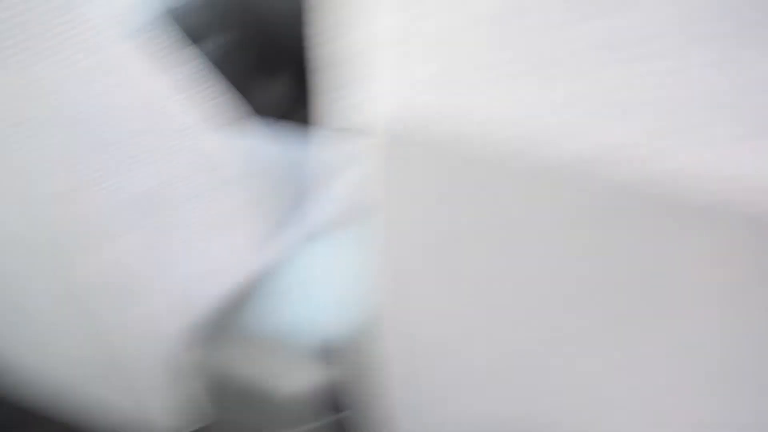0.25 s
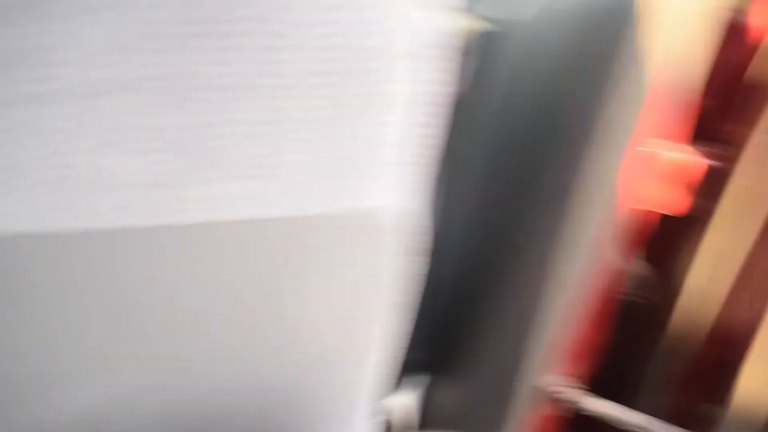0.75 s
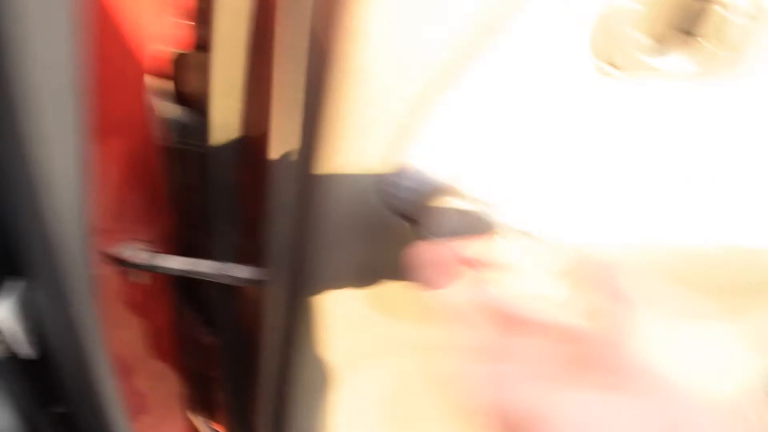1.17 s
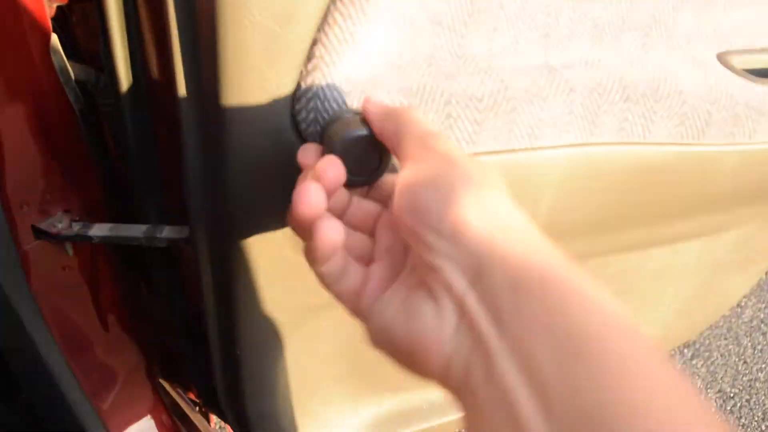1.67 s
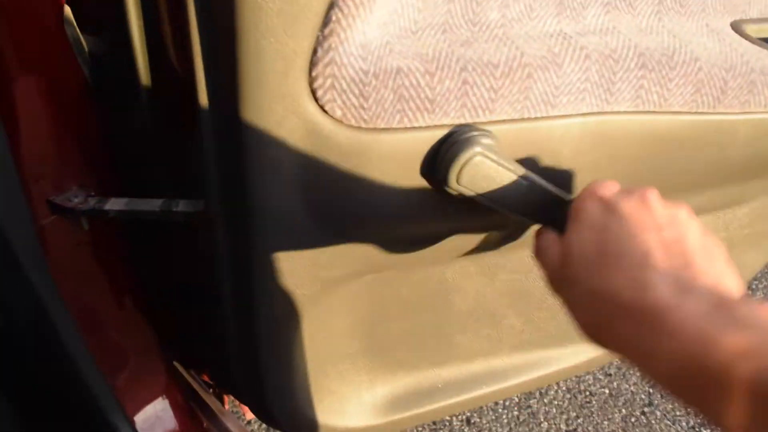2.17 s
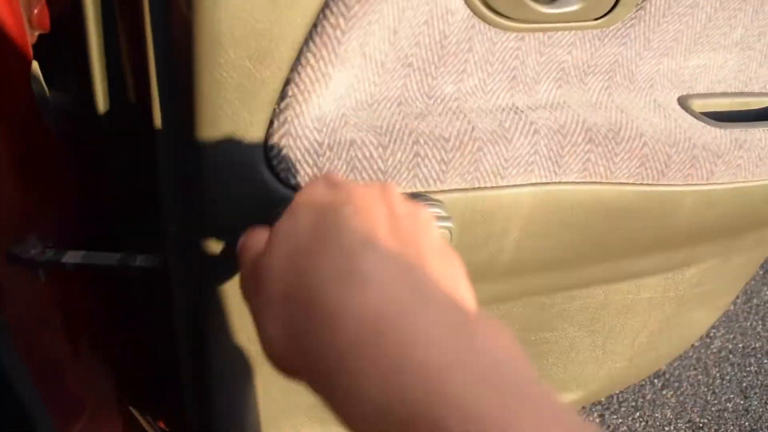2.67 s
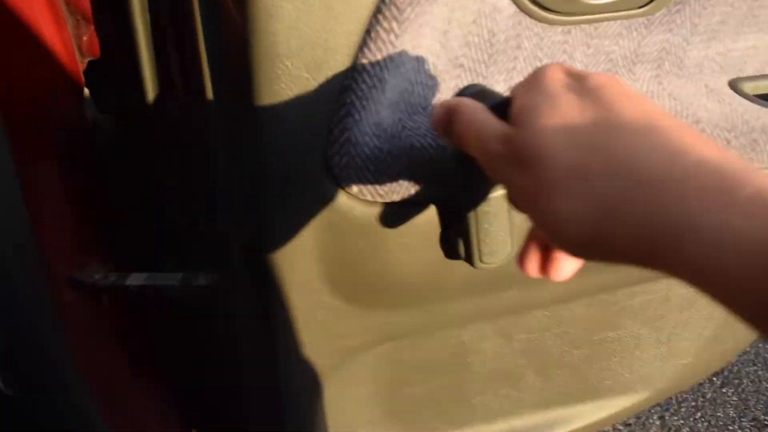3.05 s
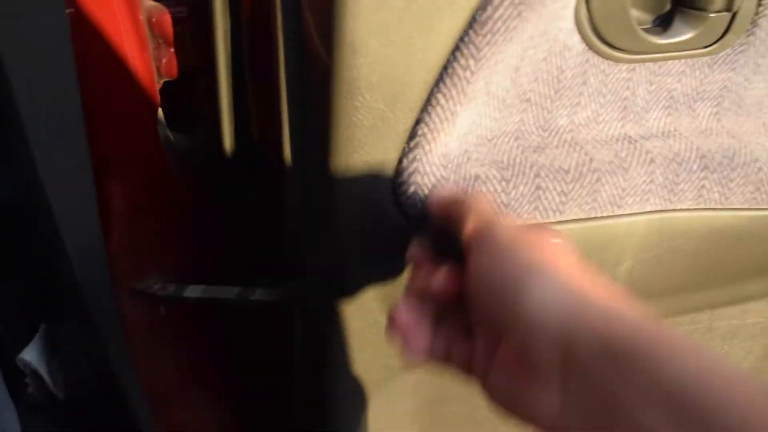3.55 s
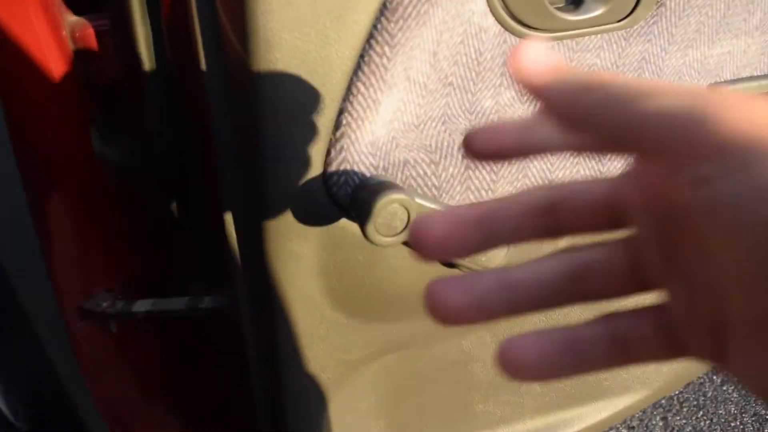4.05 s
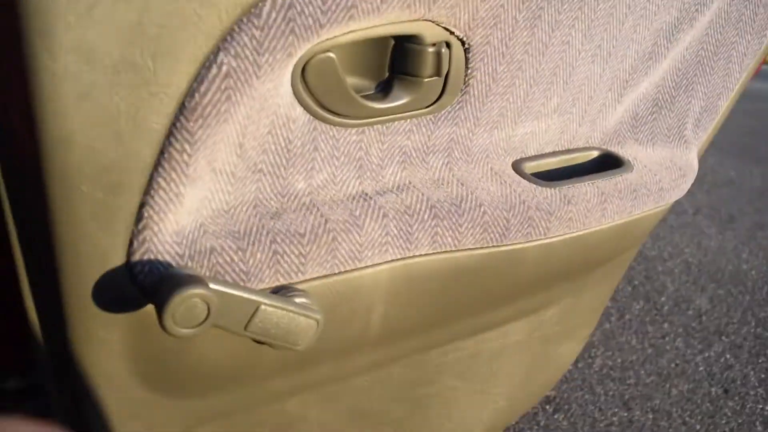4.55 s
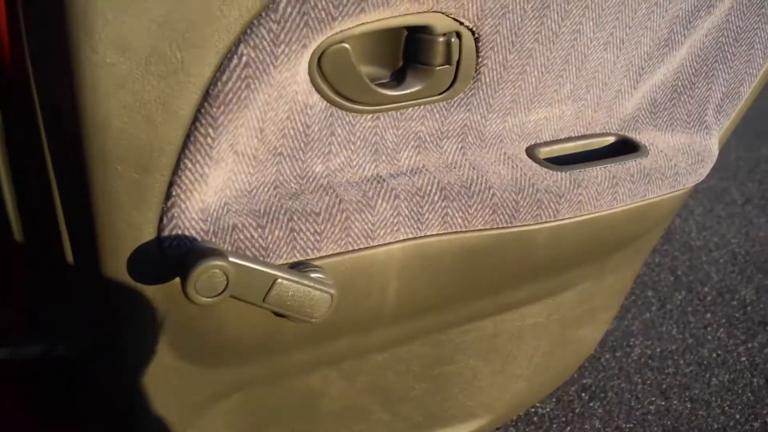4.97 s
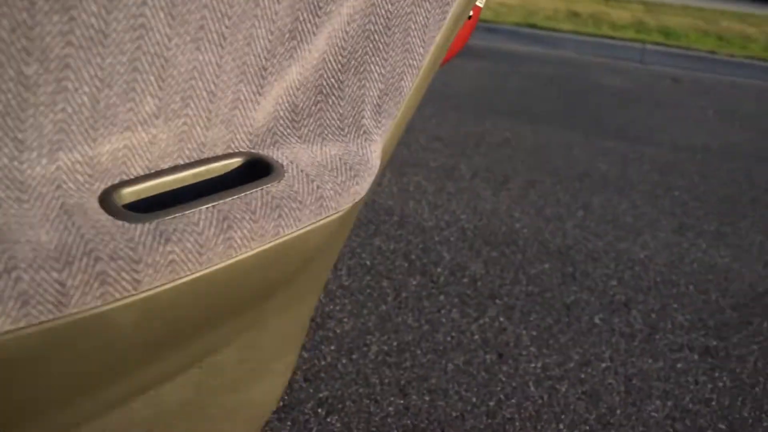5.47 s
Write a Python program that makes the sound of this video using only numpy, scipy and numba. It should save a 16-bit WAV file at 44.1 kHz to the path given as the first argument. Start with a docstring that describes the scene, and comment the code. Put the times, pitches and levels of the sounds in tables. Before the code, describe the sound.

Very close, practically mono microphone at an open car door outdoors. Tiny squeaks and faint cloth rustle lead to a sharp plastic click, then a tight cluster of clacks as the winder is taken. Two soft sliding rubs follow as it turns, ending in a loud hollow clunk. Light knocks and shuffling come next, then a last crisp click amid dry hinge creaks. Uneven low wind rumble runs beneath.

```python
"""Car window winder, open door, outdoors

A hand turns the winder close to one microphone: knob, gear and end stop ring the door modes,
plastic snaps as noise bursts, cloth and sliding glass rub as filtered noise of uneven grain.
At the end the hinge creaks in short resonant scrapes; small sine glides squeak near the start.
Breeze (moving band-pass noise), single eddies, a distant hush and two preamplifier hisses lie below.
"""
import sys
import numpy as np
from scipy import signal
from scipy.fft import rfft, irfft
from scipy.io import wavfile
from scipy.ndimage import uniform_filter1d
from numba import njit

SR = 44100
rng = np.random.default_rng(int(sys.argv[2]) if len(sys.argv) > 2 else 0)


def makeup_ratio(level_db):
    """Linear amplitude ratio for a level in decibels (20 dB per factor of ten)."""
    decades = np.asarray(level_db, float) / 20
    return 10 ** decades


def to_wav(sig):
    """Store sig (one row per channel, or 1-D mono) as 16-bit WAV at the path in sys.argv[1].

    Samples outside -1..1 are clipped; the rate is SR.
    """
    pcm = np.clip(np.atleast_2d(sig), -1, 1) * 32767
    pcm = np.round(pcm).astype(np.int16)
    wavfile.write(sys.argv[1], SR, pcm.T)  # frames by channels


N = 252119  # samples

# knocks, peaks before rattle: t/s, mid peak/dB, strongest pitch f/Hz, thud peak/dB, click peak/dB
KNOCKS = [(.432, -46, 515, -48, -42), (.62, -38.5, 403, -45.5, -44), (.654, -41.5, 506, -52, -48),
          (.762, -47, 845, -44, -41), (.841, -32.5, 830, -45, -38), (.992, -18.5, 1490, -55, -13.5),
          (1.103, -40.5, 477, -40.5, -50), (1.174, -33, 1090, -36.5, -38.5), (1.284, -29, 970, -39, -28.5),
          (1.291, -26.5, 890, -28.5, -32), (1.309, -31, 800, -30, -45), (1.343, -40, 1720, -44, -38),
          (1.577, -35.5, 570, -32.5, -61), (1.613, -44, 885, -44, -44), (1.701, -35, 875, -34, -41),
          (1.719, -24, 780, -15, -21.5), (1.723, -17.5, 600, -20.5, -31), (1.729, -19.5, 890, -24.5, -17),
          (1.753, -13, 1040, -24.5, -26), (1.761, -22, 730, -21, -36), (1.783, -31, 764, -27, -28),
          (1.799, -32.5, 600, -30.5, -44), (1.812, -35, 850, -32, -44), (1.83, -31.5, 1040, -43, -54),
          (1.923, -39, 1610, -45, -35), (1.93, -30.5, 855, -30.5, -35.5), (2.143, -35.5, 745, -42, -33),
          (2.446, -32, 1250, -41, -52), (2.781, -36.5, 730, -40.5, -63), (2.824, -26, 650, -34, -35),
          (2.847, -20, 770, -35, -32.5), (2.871, -28, 680, -30, -54), (2.894, -41, 713, -39, -47),
          (3.556, -4.5, 483, -7, -28), (3.56, -11.5, 700, -10.5, -16), (3.568, -11, 410, -19.5, -36),
          (3.575, -20, 694, -23, -40), (3.589, -25, 644, -20, -35), (3.61, -29, 500, -25, -58),
          (3.656, -46, 470, -33.5, -60), (3.683, -44, 1140, -33, -43), (3.858, -38.5, 756, -49, -48),
          (4.183, -30, 460, -35.5, -36), (4.653, -29, 1040, -34, -36.5), (4.77, -31.5, 1280, -48, -46),
          (4.818, -32.5, 1010, -39, -31.5), (4.909, -32.5, 800, -52, -37), (5.005, -25, 400, -26.5, -29.5),
          (5.132, -41, 476, -49, -41), (5.521, -17, 1026, -34, -29), (5.524, -22.5, 2200, -34, -27.5)]
# modes of door panel, winder and glass: f/Hz, relative level/dB, undamped t60/s
DOOR_MODES = [(94.2, 6.5, 0.14), (144, 2, 0.12), (182.3, -1.5, 0.21), (287, -4.5, 0.087), (345, 1.5, 0.056),
              (488, 10, 0.04), (569, 10.5, 0.028), (742, 10, 0.051), (851, 2.5, 0.082), (1040, 6, 0.057),
              (1106, 11.5, 0.033), (1216, -3, 0.099), (1281, -3, 0.13), (1510, 7, 0.053),
              (1672, 1.5, 0.042), (1960, 6, 0.11), (2300, 6.5, 0.078), (2593, 19.5, 0.029),
              (2830, 9, 0.072), (2950, 6, 0.089), (3290, 11, 0.068), (3740, 10, 0.046), (4530, 9, 0.057),
              (5160, 9.5, 0.025)]
# noise of first contact: f/Hz, width/Hz, relative level/dB
CRACK_BANDS = [(4050, 1400, 2.5), (9500, 8000, -31)]
# dry snaps of plastic on plastic: t/s, t60/s, peak/dB, centre f/Hz
SNAPS = [(.199, 0.023, -46.5, 4500), (.62, 0.018, -37.5, 3000), (.842, 0.017, -32, 3500),
         (.992, 0.014, -14.5, 3020), (1.058, .015, -50, 2500), (1.168, .04, -44, 4000),
         (1.283, 0.046, -35, 3500), (1.291, 0.037, -36, 6000), (1.343, .02, -48, 3000),
         (1.698, 0.025, -41, 2800), (1.924, 0.026, -45, 3000), (2.447, .02, -36, 2500),
         (4.185, .04, -46, 2500), (4.265, .02, -50, 4000), (4.654, .025, -40, 2200),
         (5.008, .05, -30, 3000), (5.522, 0.066, -28, 2020)]
# glass sliding in its felt, one table a pull: t/s, treble level/dB
SLIDES = [
    [(1.92, -74), (1.95, -53.5), (2.0, -51), (2.12, -50.5), (2.4, -55), (2.62, -47.5), (2.68, -51.5),
     (2.75, -81)],
    [(2.98, -61.5), (3.06, -53), (3.14, -47), (3.23, -52), (3.32, -48), (3.49, -49), (3.54, -51),
     (3.57, -63)],
]
# cloth and shoes shuffling: t/s, treble level/dB, body over treble/dB
SHUFFLE = [(0, -80, 20), (.25, -67, 6.5), (.55, -77, 5), (.7, -58.5, -4), (1.1, -62.5, 2.5),
           (1.55, -63, 0.5), (1.7, -66.5, 12), (2.85, -62, 2.5), (3.65, -63.5, 2), (3.9, -64, 6.5),
           (4.16, -55, 5), (4.31, -53.5, 7), (4.55, -54, 7.5), (4.8, -53, 6), (5.04, -47, 5),
           (5.12, -51.5, 6), (5.24, -57, 7.5), (5.45, -57.5, 12.5), (5.72, -52.5, 12.5)]
# hand and knob scraping the trim: t/s, hold/s, treble level/dB, body over treble/dB
SCRAPES = [(0.446, .01, -64, 9), (0.835, 0.032, -57.5, 3), (1.028, 0.041, -62.5, 7),
           (1.258, 0.044, -71, 14), (1.738, 0.024, -47, 8.5), (1.781, 0.066, -46, 4), (2.837, 0.1, -57, 5),
           (3.552, 0.0077, -33, -1.5), (5.14, .01, -49.5, 14.5), (5.185, .01, -52, 13.5)]
# panel body under rubbing: f/Hz, width/Hz, relative level/dB
RUB_BODY_BANDS = [(470, 400, -2.5), (754, 337, 2), (1028, 287, 1), (1394, 395, -4), (2120, 340, -10)]
# bright panel edge under rubbing: f/Hz, width/Hz, relative level/dB
RUB_EDGE_BANDS = [(1923, 440, -1.5), (2480, 760, 4.5), (3470, 1500, 0.5)]
# hinge slips: t/s, peak/dB
HINGE_SLIPS = [(5.304, -51), (5.329, -71), (5.397, -43), (5.429, -40), (5.459, -41), (5.585, -34),
               (5.617, -29.5), (5.647, -28.5), (5.672, -32.5), (5.697, -36)]
# steady hinge drag: t/s, level/dB
HINGE_DRAG = [(5.24, -85), (5.31, -63), (5.45, -50), (5.55, -57), (5.63, -70), (5.72, -58)]
# hinge resonances: f/Hz, width/Hz, relative level/dB
HINGE_BANDS = [(610, 72, 17.5), (1090, 250, 0), (1320, 67, 3)]
# squeaks of seat trim: t/s, length/s, peak/dB, mean f/Hz
SQUEAKS = [(0.2, 0.0069, -40, 2950), (.228, 0.0084, -39.5, 2940), (0.24, 0.0061, -41, 2910)]
# breeze on the capsule: t/s, eddy level/dB, eddy f/Hz
BREEZE = [(0.0, -54, 55), (0.1, -39.5, 62), (0.64, -54, 53), (1.0, -45, 68), (1.31, -40.5, 130),
          (1.45, -54.5, 90), (1.78, -47, 119), (1.97, -42, 87), (2.38, -52, 87.5), (2.5, -36, 92),
          (2.76, -37.5, 68), (3.0, -33, 86.5), (3.1, -55.5, 75.4), (3.23, -40.5, 79.6), (3.45, -51, 104),
          (3.66, -34.5, 100), (3.81, -43.5, 77.6), (3.92, -35.5, 81), (4.25, -36, 77), (4.62, -34.5, 91),
          (4.9, -39.5, 77), (5.48, -40.5, 71), (5.55, -51, 82), (5.72, -46, 105)]
# single strong eddies: t/s, peak/dB, f/Hz, length/cycles
BUFFETS = [(0.074, -31.5, 42, 1.4), (0.117, -32.5, 61, 1.65), (0.266, -30.5, 55, 2),
           (1.05, -34.5, 40, 1.15), (1.191, -39, 57, 2.6), (2.134, -30.5, 85, 0.92), (2.483, -31, 116, 1.3),
           (2.575, -21.5, 119, 1.56), (2.585, -22.5, 76.5, 2.7), (2.977, -28.5, 103, 2.4),
           (3.225, -37.5, 67, 1.9), (3.949, -22.5, 103, 2.1), (3.974, -17.5, 122, 1.17),
           (4.008, -22.5, 112, 2.5), (4.127, -26, 86, 3.1), (4.291, -26, 103, 1.6), (4.328, -23, 95, 1.3),
           (4.44, -26, 74.5, 2.1), (4.545, -15.5, 96, 2.3), (4.568, -16.5, 53, 1.4),
           (4.593, -15, 134, 1.46), (4.611, -15, 79, 0.91), (4.668, -20.5, 74, 1.57),
           (4.708, -22.5, 107.5, 2.5), (4.95, -27.5, 40.3, 1.4), (4.976, -24.5, 90, 3.8),
           (5.033, -26, 44, 1.7), (5.053, -27, 43.1, 1.15), (5.209, -32, 39, 1)]
# open-air hush with capsule hiss: f/Hz, relative density/dB
AIR_SPECTRUM = [(88, -40), (150, -9.5), (226, 3), (361, -18.5), (905, -6.5), (1260, -12.5), (1600, -15),
                (2870, -15), (5790, -24), (14800, -22.5), (16000, -46)]
# preamplifier noise: f/Hz, width/Hz, relative level/dB
PREAMP_BANDS = [(400, 170, -2), (12000, 9000, 0.5)]

THUD_TOP_HZ, CLICK_FOOT_HZ = 400, 1900
CLICK_HZ, CLICK_OCT_PER_DB = 2410, -0.05
# t60 factors: panel below THUD_TOP_HZ, modes above it, extra above CLICK_FOOT_HZ
PANEL_RING, UPPER_RING, CLICK_RING = 0.44, 0.058 / 0.12, 0.57
MODE_SCATTER_DB, MODE_RISE_CYCLES = 2.2, 1.8
CRACK_T60_S, CRACK_RISE_S = 0.029, 0.00056
RATTLE_S, RATTLE_DB = 0.02, -8
CAVITY_T60_S, CAVITY_RISE_S, CAVITY_DB = 0.18, 0.0011, -13
SNAP_RISE_S, SNAP_WIDTH_PER_HZ = 0.00042, 0.8
SLIDE_BODY_OVER_TREBLE_DB = 3
SCRAPE_RISE_S, SCRAPE_FALL_S = 0.016, 0.015  # time constants
RUB_TOP_HZ, RUB_TOP_DB = 4700, -11
RUB_FLICKER_DB, RUB_FLICKER_RATE_HZ = 0.9, 45
SLIP_DECAY_S, SLIP_RISE_S = 0.004, 0.00064  # decay is a time constant
DRAG_FLICKER_DB, DRAG_FLICKER_RATE_HZ = 3.9, 38
SQUEAK_GLIDE = 0.088  # total rise over mean pitch
GUST_RATE_HZ, FRINGE_GUST_DB = 21.86, 5.5
AIR_DB, PREAMP_DB = -58.5, -71


def curve(table):
    """Interpolate table columns to one value a sample."""
    s, *columns = np.transpose(table)
    return [np.interp(np.arange(N) / SR, s, c) for c in columns]


def level(x, db):
    """Set the rms."""
    return x * makeup_ratio(db) / np.sqrt(np.mean(x ** 2))


def peak(x, db):
    """Set the absolute peak."""
    return x * makeup_ratio(db) / np.abs(x).max()


def decay(t, t60_s):
    """Exponential fall of 60 dB in t60_s."""
    return np.exp(-np.log(1000) * t / t60_s)


def add_at(out, s, sound):
    """Add a sound in place from time s."""
    start = int(s * SR)
    out[start:start + len(sound)] += sound


@njit
def svf(x, hz, width):
    """State-variable band-pass with movable centre, gain 1 at the centre."""
    y, b, l = np.empty(len(x)), 0., 0.
    for i in range(len(x)):
        g, k = np.tan(np.pi * hz[i] / SR), width[i] / hz[i]
        v = (b + g * (x[i] - l)) / (1 + g * (g + k))
        b, l, y[i] = 2 * v - b, l + 2 * g * v, k * v
    return y


def resonate(x, bands):
    """Sum of fixed resonances, neighbours in opposite sign."""
    one = np.ones(len(x))
    return sum((-1) ** k * makeup_ratio(db) * svf(x, hz * one, width * one)
               for k, (hz, width, db) in enumerate(bands))


def walk(rate_hz):
    """Random levels held 1 / rate_hz and smoothed twice; spread near 1."""
    hold = int(SR / rate_hz)
    steps = np.repeat(rng.standard_normal(N // hold + 1), hold)
    return 1.41 * uniform_filter1d(uniform_filter1d(steps, hold), hold)[:N]


def knocks():
    """Blows ring shared modes: mid near the blow's pitch, low by its weight, top by its hardness."""
    out, skin = np.zeros(N + SR), np.zeros(N + SR)
    hz, mode_db, mode_t60_s = np.transpose(DOOR_MODES)[:, :, None]
    t = np.arange(SR // 3) / SR
    low, high = hz[:, 0] < THUD_TOP_HZ, hz[:, 0] > CLICK_FOOT_HZ
    # the hand damps the upper modes
    damping = np.where(hz < THUD_TOP_HZ, PANEL_RING, UPPER_RING)
    damping = damping * np.where(hz > CLICK_FOOT_HZ, CLICK_RING, 1)
    fade = decay(t, mode_t60_s * damping) * np.minimum(t * hz / MODE_RISE_CYCLES, 1)
    crack_shape = decay(t, CRACK_T60_S) * np.minimum(t / CRACK_RISE_S, 1)
    for s, mid_db, pitch_hz, thud_db, click_db in KNOCKS:
        # relatively harder clicks weight lower modes (negative slope)
        click_hz = CLICK_HZ * 2 ** (CLICK_OCT_PER_DB * (click_db - mid_db))
        scatter, phase = rng.standard_normal((2, len(hz), 1))
        mode_gain = makeup_ratio(mode_db + MODE_SCATTER_DB * scatter)
        rings = mode_gain * fade * np.sin(2 * np.pi * hz * t + 0.84 * phase)
        near = np.exp(-((hz - pitch_hz) / 300) ** 2) + 0.24 * (hz < CLICK_FOOT_HZ)
        bright = np.exp(-(np.log2(hz / click_hz) / 0.53) ** 2) + 0.62
        crack = resonate(rng.standard_normal(len(t)), CRACK_BANDS) * crack_shape
        mid = (rings * near)[~low].sum(0)
        thud = rings[low].sum(0)
        click = (rings * bright)[high].sum(0) + 1.73 * crack
        blow = peak(mid, mid_db) + peak(thud, thud_db) + peak(click, click_db)
        add_at(out, s, rattle(blow, min(makeup_ratio(thud_db - mid_db + 24), 1)))
        # the thud level drives the outer skin
        add_at(skin, s, peak(blow, thud_db))
    return out[:N] + cavity(skin[:N])


def rattle(blow, weight):
    """Loose parts bounce at six random, weakening lags; blows with little thud shake them less."""
    lag_s, size = rng.random((2, 6))
    lag_s = RATTLE_S * np.sort(lag_s)
    taps = np.zeros(int(RATTLE_S * SR) + 2)
    bounce = weight * makeup_ratio(RATTLE_DB) * (2 * size - 1) * np.exp(-lag_s / RATTLE_S)
    taps[(lag_s * SR).astype(int) + 1] = bounce
    taps[0] = 1
    return signal.fftconvolve(blow, taps / np.sqrt(np.sum(taps ** 2)))[:len(blow)]


def cavity(x):
    """The hollow door prolongs blows as a short dull wash: convolution with decaying noise."""
    t = np.arange(SR // 4) / SR
    wash = signal.lfilter(*signal.butter(1, 1500, fs=SR), rng.standard_normal(len(t)))
    wash = wash * decay(t, CAVITY_T60_S) * np.minimum(t / CAVITY_RISE_S, 1)
    return makeup_ratio(CAVITY_DB) * signal.fftconvolve(x, wash / np.sqrt(np.sum(wash ** 2)))[:N]


def snaps():
    """Bursts of tiny fractures: broad noise with a fast rise and decay."""
    out, t = np.zeros(N + SR), np.arange(SR // 10) / SR
    for s, t60_s, db, hz in SNAPS:
        band = [(hz, SNAP_WIDTH_PER_HZ * hz, 0)]
        burst = resonate(resonate(rng.standard_normal(len(t)), band), band)
        burst = burst * decay(t, t60_s) * np.minimum(t / SNAP_RISE_S, 1)
        add_at(out, s, peak(burst, db))
    return out[:N]


def fibre_slips():
    """Dense noise of uneven grain size with a slow flicker."""
    grain_db = 1.9 * rng.exponential(size=N)
    flicker_db = RUB_FLICKER_DB * walk(RUB_FLICKER_RATE_HZ)
    return rng.standard_normal(N) * makeup_ratio(grain_db + flicker_db)


def rub():
    """Fibre slips heard through the panel's body and its bright edge."""
    body_gain, treble_gain = rub_strength()
    body = level(resonate(fibre_slips(), RUB_BODY_BANDS), 0)
    edge = level(resonate(fibre_slips(), RUB_EDGE_BANDS), 0)
    top = resonate(fibre_slips(), [(RUB_TOP_HZ, 4000, 0)])
    top = level(resonate(top, [(RUB_TOP_HZ, 6000, 0)]), RUB_TOP_DB)
    # stronger rubbing is brighter: the top grows more than the edge
    top_growth = (treble_gain / makeup_ratio(-41.5)) ** 0.35
    return body_gain * body + treble_gain * (edge + top_growth * top)


def rub_strength():
    """Body and treble gains of shuffle, slides and scrapes together; powers add."""
    t = np.arange(N) / SR
    db, body_db = curve(SHUFFLE)
    parts = [(makeup_ratio(db), body_db)]
    for pull in SLIDES:
        active = (t > pull[0][0]) * (t < pull[-1][0])
        parts.append((makeup_ratio(curve(pull)[0]) * active, SLIDE_BODY_OVER_TREBLE_DB))
    for s, hold_s, db, body_db in SCRAPES:
        rise = np.minimum(t - s, 0) / SCRAPE_RISE_S
        fall = np.maximum(t - s - hold_s, 0) / SCRAPE_FALL_S
        parts.append((makeup_ratio(db) * np.exp(rise - fall), body_db))
    body_power = sum((gain * makeup_ratio(b)) ** 2 for gain, b in parts)
    treble_power = sum(gain ** 2 for gain, b in parts)
    return np.sqrt(body_power), np.sqrt(treble_power)


def creak():
    """The dry hinge drags and lets go in short scrapes, each ringing it briefly."""
    out, t = np.zeros(N + SR), np.arange(SR // 20) / SR
    shape = np.exp(-t / SLIP_DECAY_S) * np.minimum(t / SLIP_RISE_S, 1)
    for s, db in HINGE_SLIPS:
        slip = resonate(rng.standard_normal(len(t)) * shape, HINGE_BANDS)
        add_at(out, s, peak(slip, db))
    grit = makeup_ratio(DRAG_FLICKER_DB * walk(DRAG_FLICKER_RATE_HZ)) * rng.standard_normal(N)
    drag = level(resonate(grit, HINGE_BANDS), 0)
    return out[:N] + makeup_ratio(curve(HINGE_DRAG)[0]) * drag


def squeaks():
    """A few milliseconds of clean stick-slip tone that rises a little."""
    out = np.zeros(N)
    for s, length_s, db, hz in SQUEAKS:
        u = np.arange(int(length_s * SR)) / (length_s * SR)
        turns = hz * length_s * (u + SQUEAK_GLIDE * (u ** 2 - u) / 2) + rng.random()
        add_at(out, s, makeup_ratio(db) * np.sin(np.pi * u ** 0.54) * np.sin(2 * np.pi * turns))
    return out


def breeze():
    """Eddies roll over the capsule as moving band noise, with a slower swell and a rougher fringe."""
    db, hz = curve(BREEZE)
    eddy = svf(svf(rng.standard_normal(N), hz, 1.14 * hz), hz, 1.22 * hz)
    swell = svf(rng.standard_normal(N), 0.4 * hz, 0.14 * hz)
    fringe = svf(svf(rng.standard_normal(N), 1.56 * hz, 1.5 * hz), 2.07 * hz, 2.9 * hz)
    gust = walk(GUST_RATE_HZ)
    eddy = level(makeup_ratio(5.35 * gust + 1.53 * walk(10)) * eddy, 0)
    fringe = level(makeup_ratio(FRINGE_GUST_DB * gust) * fringe, -18)
    return makeup_ratio(db) * (eddy + level(swell, -10) + fringe)


def buffets():
    """A strong eddy pushes the membrane through about one to four cycles under a Hann window."""
    out = np.zeros(N + SR)
    for s, db, hz, cycles in BUFFETS:
        turn = np.arange(int(SR * cycles / hz)) * hz / SR
        skew = 0.45 * np.sin(2 * np.pi * turn)
        push = np.hanning(len(turn)) * np.sin(2 * np.pi * (turn + rng.random()) + skew)
        add_at(out, s, peak(push, db))
    return out[:N]


def air():
    """Smooth distant hush: noise shaped in the spectrum."""
    hz = np.maximum(np.arange(N // 2 + 1) * SR / N, 1)
    point_hz, point_db = np.transpose(AIR_SPECTRUM)
    db = np.interp(np.log(hz), np.log(point_hz), point_db)
    return level(irfft(rfft(rng.standard_normal(N)) * makeup_ratio(db), N), AIR_DB)


def scene():
    """One capsule feeds both channels."""
    contact = knocks() + snaps() + rub() + creak() + squeaks()
    return np.tile(contact + breeze() + buffets() + air(), (2, 1))


def top_cut(x):
    """Nothing passes above the cut-off."""
    return signal.sosfilt(signal.butter(12, 16330, fs=SR, output="sos"), x)


def record(dry):
    """Channels differ slightly in treble gain; each preamplifier adds its own noise."""
    treble_band = [(3500, 5500, 0)]
    treble = resonate(resonate(dry[0], treble_band), treble_band)
    mismatch = makeup_ratio(-39.5) * treble * np.array([[-1], [1]])
    hiss = np.array([resonate(rng.standard_normal(N), PREAMP_BANDS) for _ in range(2)])
    return top_cut(dry + mismatch + level(hiss, PREAMP_DB))


dry = scene()
out = record(dry)
to_wav(out)
```